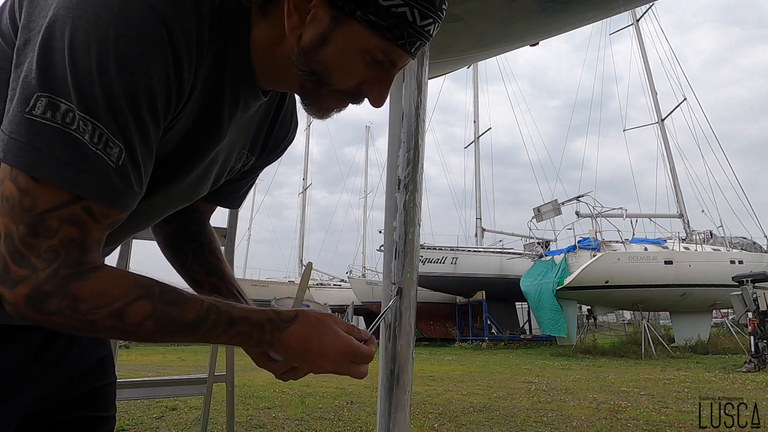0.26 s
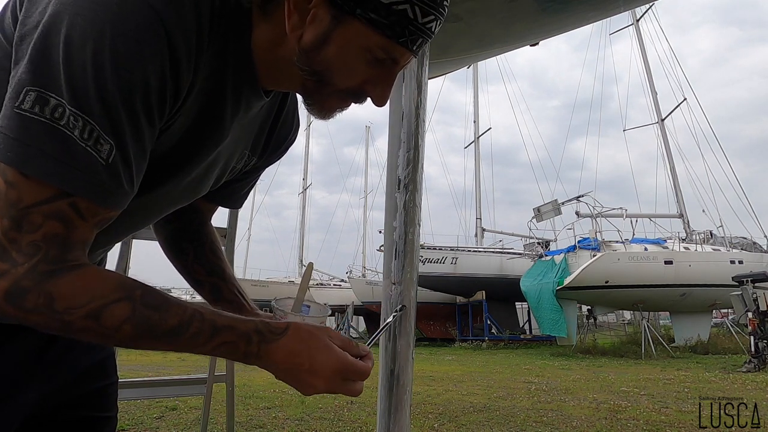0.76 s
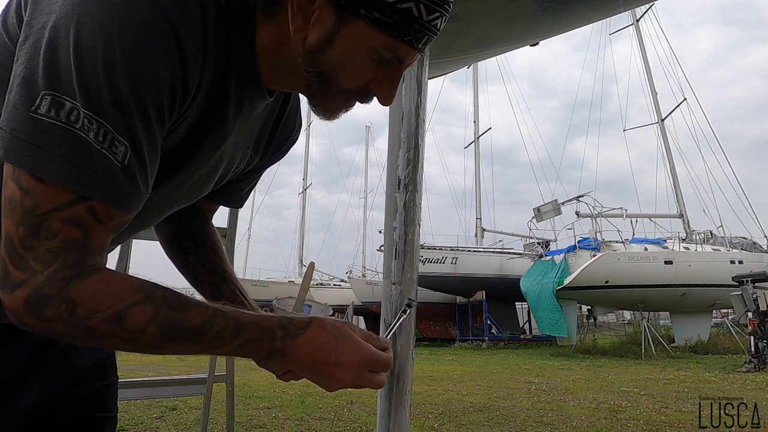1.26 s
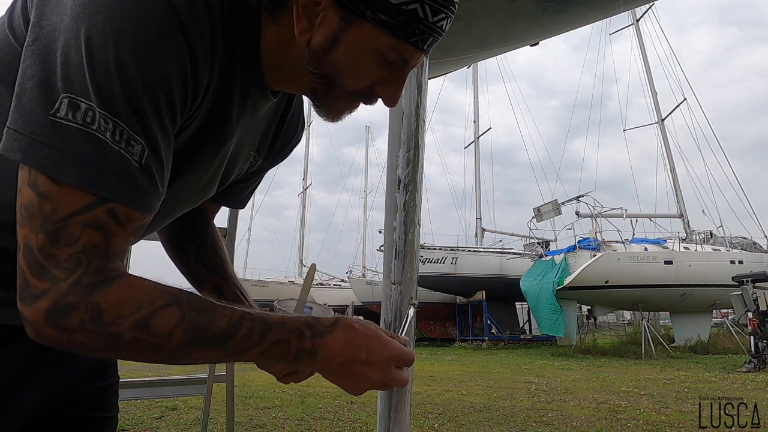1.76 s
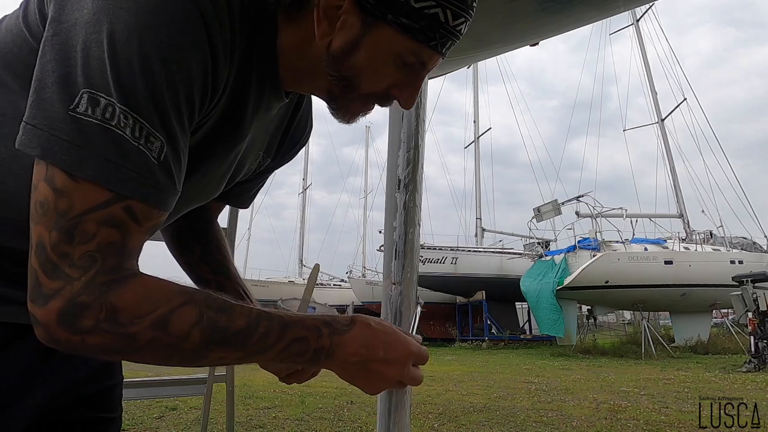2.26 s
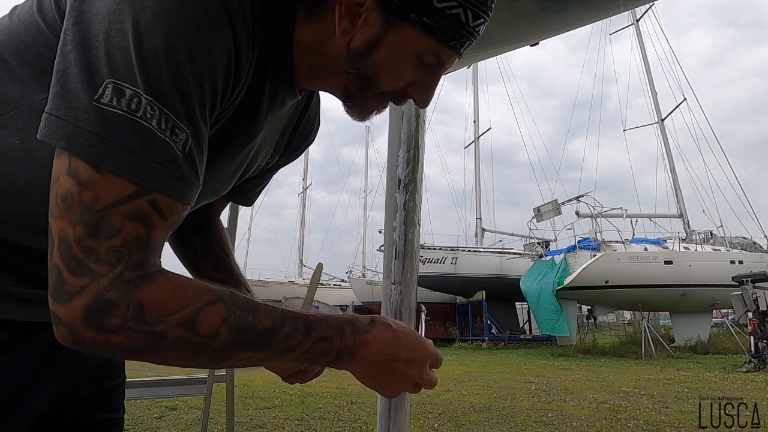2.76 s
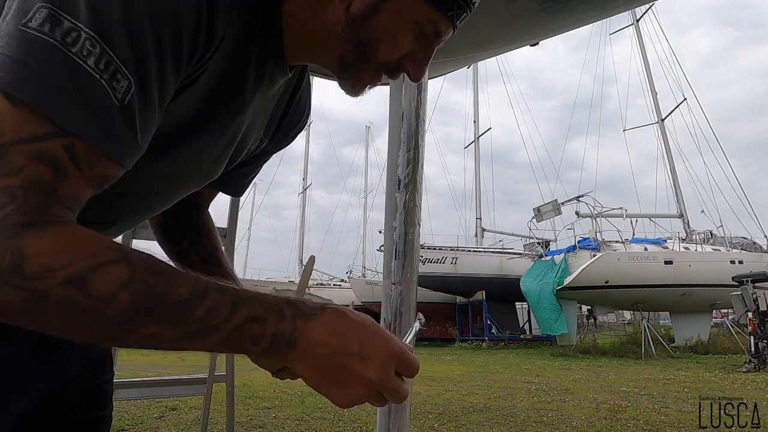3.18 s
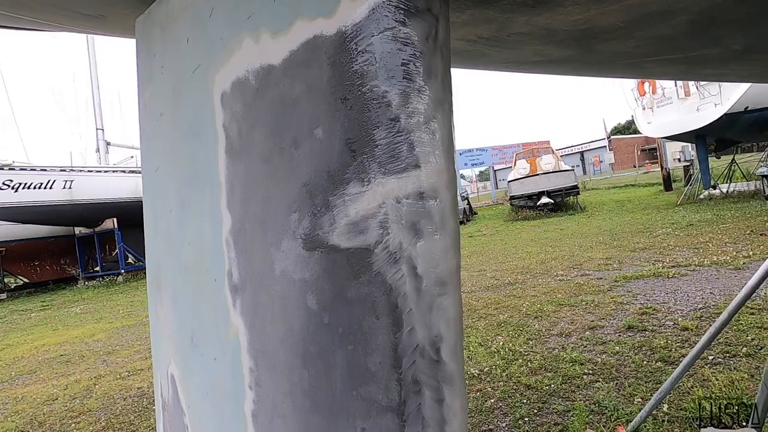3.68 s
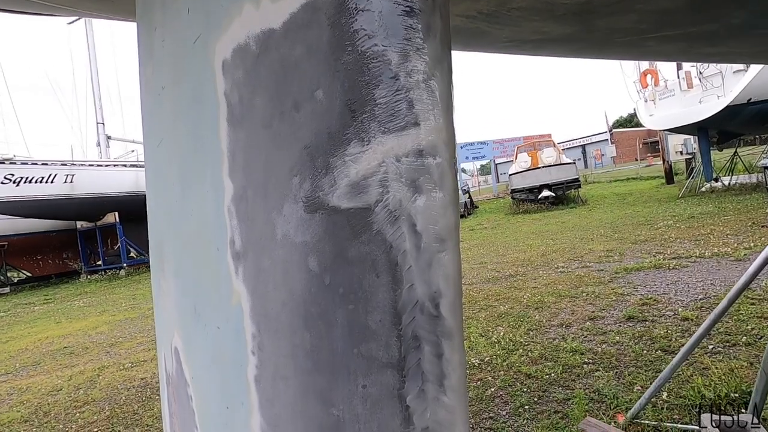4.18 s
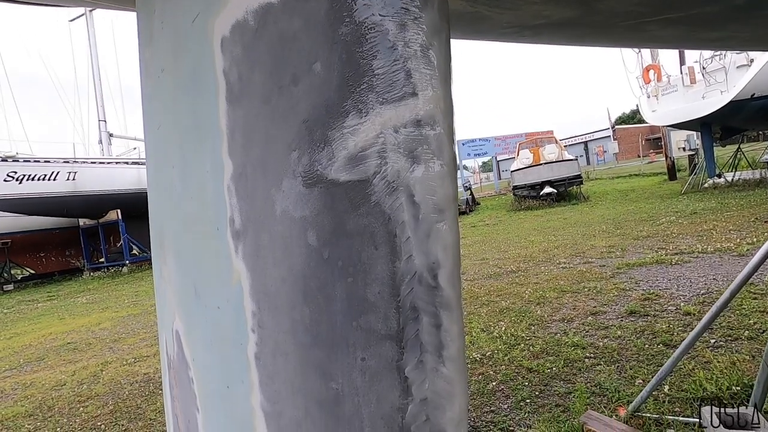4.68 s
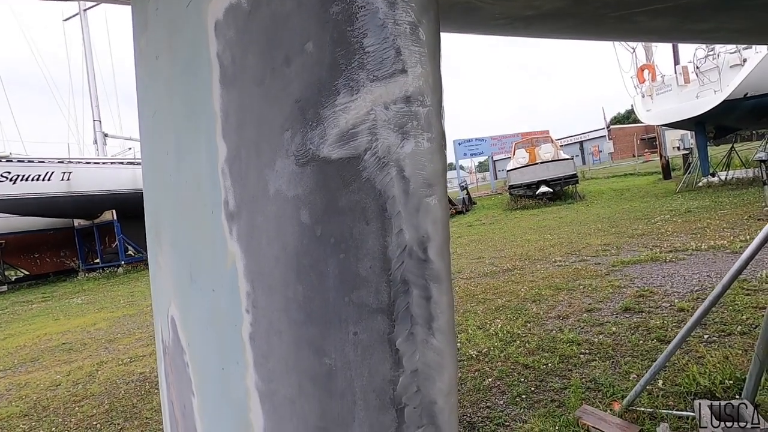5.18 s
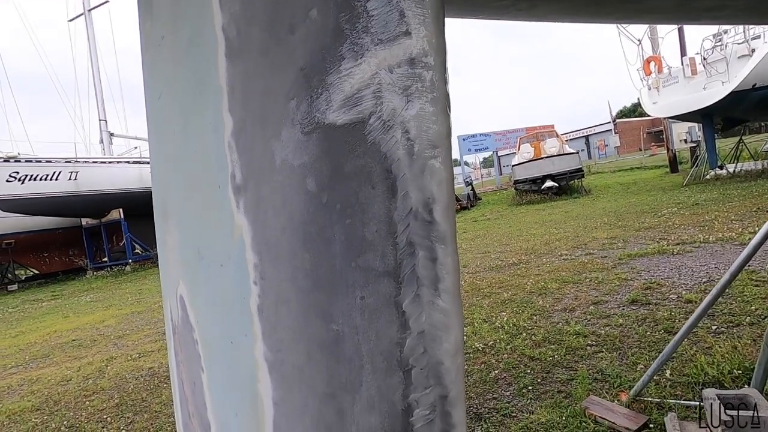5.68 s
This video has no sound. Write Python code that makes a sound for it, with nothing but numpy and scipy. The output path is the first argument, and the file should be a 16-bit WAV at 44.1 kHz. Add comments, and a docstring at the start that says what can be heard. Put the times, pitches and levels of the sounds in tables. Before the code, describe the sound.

From the start a low engine hums steadily in an open boatyard, leaning left, with light wind buffeting the microphone. Close by, a steel blade works sticky filler onto a boat's fin, making faint crackles and scattered dry ticks. At about 0.8 seconds it gives a quick ringing tap. From 3.2 to 3.6 seconds it drags over grit in short scrapes, snagging with small cracks and dull knocks.

At 3.6 seconds the hum cuts off abruptly and the sound moves to the centre. A distant diesel idles under a soft outdoor rumble while the ticks and crackles continue. The blade taps and rings at about 4.1 and 4.9 seconds, and two soft, very low handling thumps come at 4.1 and 4.6. Steel tools clink lightly at 4.2 and 5.0 seconds, then harder at 5.7 with a brief scrape.

```python
"""Filling a boat's fin

A boatyard in light wind: an engine hums low while a steel blade works filler onto the fin.
The blade scrapes over grit, snags, ticks and rings; the sticky filler crackles as it tears.
At an abrupt change of place the hum is gone: a far diesel idles, the blade works on,
steel tools clink close by and the hand on the microphone thumps softly."""
import sys
import numpy as np
from scipy import signal
from scipy.fft import rfft, irfft, next_fast_len
from scipy.io import wavfile
from scipy.ndimage import map_coordinates

SR = 44100
rng = np.random.default_rng(int(sys.argv[2]) if len(sys.argv) > 2 else 0)


def to_wav(s):
    """Save 16-bit WAV."""
    ch = np.atleast_2d(s).T  # columns
    pcm = np.round(np.clip(ch, -1, 1) * 32767)  # PCM
    wavfile.write(sys.argv[1], SR, pcm.astype(np.int16))


N = 261065
TIME_S = np.arange(N) / SR
CHANGE_S = 3.636  # first place to second
SIDES = np.array([[.5], [-.5]])  # left, right

# grit under the blade (frequency [Hz], density [dB])
GRIT_SPECTRUM = [(200, -46), (600, 0.5), (1500, 0.5), (3000, 0.5), (5000, -4), (7200, -9.5), (8500, -25.5),
                 (13000, -39.5), (16000, -48)]


def amp(db):
    """Decibels to gain."""
    return 10 ** (np.asarray(db) / 20)


def unit(x):
    """Scale to rms 1."""
    return x / np.sqrt(np.mean(x ** 2) + 1e-20)


def along(points, hz):
    """Read (frequency, value) points on a log axis."""
    knots_hz, values = np.transpose(points)
    return np.interp(np.log(hz + 1), np.log(knots_hz + 1), values)


def curve(points):
    """Read (time, value) points at every sample."""
    return np.interp(TIME_S, *np.transpose(points))


def wobble(rate_hz):
    """Smooth random curve."""
    return map_coordinates(rng.standard_normal(int(N * rate_hz / SR) + 4), [TIME_S * rate_hz])


def filtered(x, response):
    """Apply a complex frequency response."""
    size = x.shape[-1]
    padded = next_fast_len(size + 2 ** 12)
    return irfft(rfft(x, padded) * response(np.fft.rfftfreq(padded, 1 / SR)), padded)[..., :size]


def noise(spectrum, size):
    """Coloured noise, rms 1."""
    return unit(filtered(rng.standard_normal(size), lambda hz: amp(along(spectrum, hz))))


def rush(spectrum, coherence):
    """Stereo noise, rms 1; coherence as (frequency [Hz], left-right correlation)."""
    def response(hz):
        angle = np.arccos(np.clip(along(coherence, hz), -1, 1)) / 2
        return amp(along(spectrum, hz)) * [np.cos(angle), np.sin(angle)]
    mid, side = filtered(rng.standard_normal((2, N)), response)
    return unit(np.array([mid + side, mid - side]))


def tone(cycles, flutter_db, drift_rad):
    """Partial of rms 1; moving air makes level and phase waver."""
    phase = 2 * np.pi * (cycles + rng.random()) + drift_rad * wobble(5)
    return unit(np.sin(phase) * amp(flutter_db * wobble(11)))


def add(track, s, sound):
    """Mix a sound in at time s."""
    start = max(round(s * SR), 0)
    track[start:start + len(sound)] += sound[:max(N - start, 0)]


def attack(t, rise_s):
    """Exponential rise to 1."""
    return 1 - np.exp(-t / rise_s)


def ring(modes, t):
    """Damped modes, excited a little differently by each blow."""
    return sum(amp(db + rng.normal() - 60 * t / t60_s) * rng.choice([-1, 1]) * np.sin(2 * np.pi * hz * t)
               for hz, db, t60_s in modes)


def yard_air():
    """Distant yard noise at each of the two places."""
    # slow trend (time [s], relative level [dB])
    trend = [(0, -51), (2.4, -55.5), (3.63, -55), (3.65, -56), (5, -56), (5.92, -54)]
    # air at each place (frequency [Hz], density [dB])
    first_spectrum = [(100, -11), (400, -0.5), (700, -3.5), (1000, 1.5), (1400, 3), (2000, -5.5),
                      (3000, -11.5), (4500, -17), (7300, -20), (8400, -36), (16000, -59)]
    second_spectrum = [(12, -6), (30, 25), (130, 28), (230, 20), (320, 10), (450, 4.5), (580, -0.5),
                       (800, 1.5), (1600, 1.5), (2600, -10), (4500, -15), (7500, -18.5), (8800, -25.5),
                       (14000, -42.5)]
    # likeness of the microphone ports (frequency [Hz], correlation)
    first_coherence = [(100, 0.68), (1200, 1), (3000, 0.24), (5000, 0.15), (10000, 0.12)]
    second_coherence = [(30, 0.4), (150, 0.95), (1000, 0.97), (4000, 0.93), (9000, 0.39), (13000, 0.39)]
    trend_db = curve(trend)
    first = amp(trend_db + 2.5 + 1.6 * wobble(4.51)) * rush(first_spectrum, first_coherence)
    second = amp(trend_db + 15 + 0.7 * wobble(4.8)) * rush(second_spectrum, second_coherence)
    return first, second


def machinery():
    """Faint steady tones from across the yard, at each of the two places."""
    # whine (frequency [Hz], level at first place [dB], at second [dB])
    lines = [(106, -45, -62), (232, -52, -58), (360, -62.5, -67.5), (506, -63.5, -92)]
    return sum(amp([[first_db], [second_db]]) * tone(hz * TIME_S, flutter_db=4.5, drift_rad=0.85)
               for hz, first_db, second_db in lines)


def wind():
    """Gusts swell over a breeze and buffet each microphone port with low lumps of pressure."""
    # breeze at each place (relative level [dB], left minus right [dB])
    breeze = [(-40, 1), (-61, 0)]
    # gusts (peak time [s], length [s], relative level [dB], left minus right [dB])
    gusts = [(0.26, 0.48, -36, 8), (1.181, 0.66, -41, 4.5), (1.537, 0.14, -31.5, 18),
             (4.747, 0.42, -34.5, -3), (5.373, 0.69, -39, 30), (5.725, 0.56, -42, 4.5)]
    # buffeting (frequency [Hz], density [dB])
    spectrum = [(4, -23.5), (12, -4), (28, 2), (50, 0), (75, -0.5), (110, -9), (170, -19), (300, -37),
                (600, -58), (1500, -120)]
    at_ports = lambda db, lean_db: amp(db + SIDES * lean_db) / amp(SIDES * lean_db).mean()
    power = np.where(TIME_S < CHANGE_S, at_ports(*breeze[0]), at_ports(*breeze[1])) ** 2
    for s, length_s, db, lean_db in gusts:
        swell = np.cos(np.pi * np.clip((TIME_S - s) / length_s, -.5, .5))
        power += (at_ports(db, lean_db) * swell) ** 2
    lumps_db = 1.3 * np.array([wobble(28), wobble(11)])
    return np.sqrt(power) * amp(3.5 + lumps_db) * rush(spectrum, [(25, 1), (100, 0.88)])


def bumps():
    """The hand on the microphone shifts: soft, very low thumps."""
    # thumps (time [s], length [s], pitch [Hz], level [dB])
    thumps = [(4.114, 0.064, 41.5, -24), (4.632, 0.066, 33, -25)]
    track = np.zeros(N)
    for s, length_s, hz, db in thumps:
        t = np.arange(int(length_s * SR)) / SR
        add(track, s, amp(db) * np.hanning(len(t)) * np.sin(2 * np.pi * (hz * t + rng.random())))
    return track


def diesel():
    """Six unequal cylinders repeat their pattern every working cycle, so the idle lopes."""
    # partials (multiple of the cycle rate, level [dB])
    orders = [(6, -47), (10, -53), (12, -42), (15, -49), (16, -48), (18, -44), (21, -45), (23, -44),
              (24, -46), (25, -54), (28, -52), (29, -52), (30, -58), (36, -57), (37, -59)]
    cycle_hz = 5.834
    cycles = cycle_hz * TIME_S + 0.0023 * wobble(2.073)
    return sum(amp(db) * tone(round(k) * cycles, flutter_db=0.5, drift_rad=0.023) for k, db in orders)


def engine():
    """Two firings per shaft turn; the hum grows with speed, the exhaust adds a throbbing drone."""
    # speed picks up, then eases (time [s], firing rate [Hz])
    speed = [(0.2, 82.7), (0.9, 83.6), (1.3, 82.6), (1.6, 82.4), (2.1, 81.3), (3.1, 81.1), (3.5, 80.6)]
    # partials (multiple of the shaft rate, relative level [dB], gain with firing rate [dB/Hz])
    orders = [(1, -6, 1.9), (2, 0.5, 3), (3, -14, -2), (4, -18, 0.5), (5, -37.5, 6), (6, -34, 2),
              (8, -39.5, 5.5)]
    # exhaust (frequency [Hz], density [dB])
    drone = [(30, -36.5), (100, -7), (170, 1.5), (230, -9), (300, -12), (370, -15), (420, -26.5),
             (470, -17.5), (515, -12.5), (560, -20), (630, -30.5), (1200, -58), (3000, -120)]
    firing_hz, cruise_hz = curve(speed), 82
    turns = np.cumsum(firing_hz / 2) / SR
    partial = lambda k: tone(k * turns, flutter_db=0.35 * k, drift_rad=0.03 * k)
    hum = sum(amp(db + db_per_hz * (firing_hz - cruise_hz)) * partial(round(k))
              for k, db, db_per_hz in orders)
    hum *= amp(-25 + 0.6 * wobble(8))
    throb = 1 + 0.31 * np.sin(2 * np.pi * 2 * turns)
    return hum + amp(-39.5) * throb * rush(drone, [(100, 0.74), (500, 0.47)])


def hulls(x, t60_s):
    """Scattered echoes from the hulls around."""
    t = np.arange(SR // 2) / SR
    tails = np.array([noise([(300, -7.5), (3500, 10), (9000, -5.5)], len(t)) for _ in range(2)])
    tails *= amp(-60 * t / t60_s) * (t > .006)
    return signal.fftconvolve(x[None], tails / np.linalg.norm(tails[0]), axes=1)[:, :N]


def nearby(x, lean_db, scatter):
    """Close sound, louder at left, smeared by hands and hull; scatter as (frequency [Hz], gain [dB])."""
    t = np.arange(SR // 128) / SR
    smear = rng.standard_normal(len(t)) * amp(-60 * t / 0.027)
    smeared = signal.fftconvolve(x, smear[None] / np.linalg.norm(smear))[:, :N]
    scattered = filtered(smeared, lambda hz: amp(along(scatter, hz)))
    return amp(SIDES * lean_db) * (x + 2 * SIDES * scattered)


def crackle():
    """Sticky filler tears in clumps of tiny, bright snaps."""
    # snaps at each place (base rate [1/s], base level [dB])
    tearing = [(45, -72), (85, -69.5)]
    # one snap (frequency [Hz], density [dB])
    spectrum = [(1000, -20), (4500, -6), (7300, 1), (8800, -7), (12500, -9), (16000, -22)]
    t60_s = 0.011
    per_s, db = np.where(TIME_S < CHANGE_S, *np.array(tearing)[:, :, None])
    snaps = rng.random(N) < per_s * amp(5 * wobble(10)) / SR
    sizes = amp(db + 4.5 * np.minimum(rng.exponential(size=N), 3))
    power = signal.lfilter([1], [1, -amp(-60 / (t60_s * SR)) ** 2], snaps * sizes ** 2)
    return np.sqrt(np.abs(power)) * noise(spectrum, N)


def scrapes():
    """The blade drags over grit in tiny catches: quick rise, slower fade."""
    # strokes (time [s], length [s], level [dB], tilt [dB/octave])
    strokes = [(2.138, 0.067, -63, 6), (3.211, 0.19, -52.5, 0.5), (3.218, 0.075, -58.5, 12.5),
               (3.352, 0.3, -65.5, 6), (3.501, 0.13, -51.5, 0), (3.534, 0.044, -46.5, -1.5),
               (3.582, 0.054, -53, 0), (3.794, 0.05, -63, 10.5), (4.059, 0.051, -65, 26),
               (5.723, 0.085, -52.5, 3)]
    track, catch_samples = np.zeros(N), 32
    for s, length_s, db, tilt_db in strokes:
        size = int(length_s * SR)
        hiss = rng.standard_normal(size)
        catches_db = 3.6 * np.minimum(rng.exponential(size=size // catch_samples + 1), 3.5)
        colour = lambda hz: amp(along(GRIT_SPECTRUM, hz) + tilt_db * np.log2(np.maximum(hz, 500) / 3000))
        grit = filtered(hiss * amp(catches_db).repeat(catch_samples)[:size], colour)
        swell = np.abs(np.sin(np.pi * np.linspace(0, 1, size) ** 0.69))
        add(track, s, amp(db) * unit(grit) * unit(swell))
    return track


def thud(pitch_hz, t, t60_s):
    """Two broad resonances that die quickly."""
    width = 0.46  # bandwidth over pitch
    peak = lambda hz, fc: 1j * hz * width * fc / (fc * fc - hz * hz + 1j * hz * width * fc)
    response = lambda hz: peak(hz, pitch_hz) ** 2 + 0.073 * peak(hz, 1.7 * pitch_hz) ** 2
    return unit(filtered(rng.standard_normal(len(t)), response)) * amp(-60 * t / t60_s)


def snags():
    """Pressed flat, the blade cannot ring: each lump gives a dead thud and a gritty crack."""
    # lumps and dents (time [s], thud [dB], pitch [Hz], t60 [s], crack [dB])
    lumps = [(0.809, -37, 565, .07, -60.5), (3.248, -44.5, 3000, .03, -50.5),
             (3.264, -39.5, 1300, .04, -35), (3.292, -42.5, 2170, 0.054, -38),
             (3.337, -40.5, 990, 0.11, -55), (3.351, -39.5, 1046, 0.04, -42.5),
             (3.5366, -40.5, 2930, 0.035, -37.5), (3.541, -45, 2600, 0.022, -38),
             (3.5468, -46, 3000, 0.012, -44), (3.5596, -48, 3000, .04, -42),
             (3.6204, -28, 1200, 0.028, -51)]
    track, t = np.zeros(N), np.arange(SR // 8) / SR
    for s, db, hz, t60_s, crack_db in lumps:
        crack = amp(crack_db - 60 * t / 0.013) * noise(GRIT_SPECTRUM, len(t))
        add(track, s, (amp(db) * thud(hz, t, t60_s) + crack) * attack(t, rise_s=0.0002))
    return track


def ticks():
    """Dry contacts of blade and filler, each with its own brightness."""
    # contacts (time [s], relative level [dB], tilt [dB/octave])
    contacts = [(0.238, -49.5, 19), (0.447, -36.5, -3.5), (0.701, -49.5, -1), (0.919, -48, -3),
                (1.061, -44, 7), (1.493, -55, 12), (1.666, -49, -2.5), (1.85, -57.5, 12.5),
                (1.897, -44, -10), (2.171, -48, -8), (2.228, -34.5, -2), (2.83, -43.5, -7.5),
                (3.3596, -39.5, 1), (3.366, -42, 3.5), (3.7783, -38.5, -3), (3.799, -34.5, -6.5),
                (4.0195, -42.5, 6.5), (4.043, -42.5, -2.5), (4.091, -46, 2), (4.1092, -37.5, 14.5),
                (4.1966, -50, 14.5), (4.247, -47, 8.5), (4.268, -37.5, -4.5), (4.332, -47.5, 1.5),
                (4.58, -44.5, 14), (4.748, -36, -1.5), (5.183, -37.5, 3.5), (5.333, -44.5, -3.5),
                (5.686, -38, -12.5), (5.7195, -44.5, -6), (5.742, -37.5, 15.5), (5.797, -40, -1),
                (5.8798, -41, 8)]
    # one tick (frequency [Hz], density [dB])
    spectrum = [(500, -39), (2000, -18.5), (4500, -8), (7200, 1.5), (8800, -15), (13000, -23), (16000, -33)]
    track, t = np.zeros(N), np.arange(SR // 16) / SR
    envelope = (amp(-60 * t / 0.0057) + amp(-8.5 - 60 * t / 0.055)) * attack(t, rise_s=0.00089)
    for s, db, tilt_db in contacts:
        colour = [(hz, level + tilt_db * np.log2(hz / 7000) + rng.normal(0, 2)) for hz, level in spectrum]
        add(track, s, amp(db - 5.5) * envelope * noise(colour, len(t)))
    return track


def taps():
    """Blade on fin: the contact point sets which modes ring, the grip how long; the fin knocks."""
    # contacts (time [s], four blade modes [dB], knock [dB], crack [dB], grip's factor on t60)
    contacts = [(0.7963, -39, -54, -52, -35, -47.5, -45, 0.49),
                (0.7985, -35, -60, -51.5, -29.5, -54, -46, 0.42),
                (0.8075, -58.5, -46, -54, -44, -51, -50, .6),
                (0.8135, -43.5, -58.5, -60, -52, -58, -57, 0.83),
                (0.8194, -40.5, -56, -62, -56, -57.5, -60, 0.3),
                (1.756, -79, -80, -66, -57.5, -81, -70, 0.9),
                (2.021, -74.5, -74.5, -60, -71, -69, -58.5, 1.9),
                (3.115, -52, -72, -76, -81, -73, -63, 0.54),
                (3.195, -63, -43.5, -54, -45, -70, -44.5, 0.23),
                (4.1085, -61, -56, -50, -31.5, -36.5, -43.5, 0.8),
                (4.1124, -60, -61, -48, -30.5, -42, -41, 0.8), (4.116, -56, -54, -56, -40, -46.5, -39.5, 1),
                (4.1222, -53, -43.5, -60, -47, -42.5, -52, 0.85),
                (4.9051, -52, -52, -60, -45, -43, -41.5, 1), (4.9148, -57, -51, -68, -56, -46, -57, 0.66),
                (4.965, -66, -56, -54, -68, -64, -54, 0.44)]
    # blade modes (frequency [Hz], base t60 [s])
    blade_modes = [(2706, .23), (3405, .25), (6270, .08), (6498, .047)]
    # dull fin modes (frequency [Hz], relative level [dB], t60 [s])
    fin_modes = [(630, -5.5, 0.042), (1150, 2, .035), (1428, 4, 0.067), (1566, 2, 0.035),
                 (2320, -0.5, 0.075), (2864, -12, 0.12), (3558, -15, 0.055), (4170, -8, 0.046)]
    # contact crack (frequency [Hz], density [dB])
    spectrum = [(300, -42), (850, -1), (1300, -7), (2000, 4.5), (4600, 5), (5600, -3), (7300, 4),
                (9000, -18), (13000, -34), (16000, -48)]
    track, t = np.zeros(N), np.arange(SR // 3) / SR
    next_times = [row[0] for row in contacts[1:]] + [N / SR]
    for (s, *modes_db, knock_db, crack_db, grip), next_s in zip(contacts, next_times):
        modes = [(hz, db, t60_s * max(grip, .1)) for (hz, t60_s), db in zip(blade_modes, modes_db)]
        crack = amp(crack_db - 60 * t / 0.085) * noise(spectrum, len(t))
        tap = ring(modes, t) + amp(knock_db) * ring(fin_modes, t) + crack
        choke = amp(-60 * np.maximum(s + t - next_s, 0) / 0.0062)  # next contact stops the ring
        add(track, s, tap * attack(t, rise_s=0.00031) * choke)
    return track


def clinks():
    """Steel on steel rattles and rings: a light touch wakes a few modes, a hard blow nearly all."""
    # blows (time [s], ring [dB], rattle [dB], tilt [dB/octave], hardness [0-1])
    blows = [(4.2432, -43, -44.5, -14, 0), (5.0397, -35, -41.5, -0.5, 0), (5.7406, -24, -26, 1, 0.86),
             (5.7478, -40, -37.5, -10, 0.9)]
    # tool modes (frequency [Hz], light touch [dB], hard blow [dB], t60 [s])
    steel_modes = [(1250, -14, -22, .13), (1987, 1, 0, .12), (2309, -15, -5, .12), (2638, -5, -6, .1),
                   (2990, -26, -6, .13), (3056, -10, -6, .15), (3413, -21, -10, .12), (3741, -18, -8, .09),
                   (3898, -9, -6, .09), (4161, -9, 0, .08), (4441, -12, -7, .11), (4755, -9, -6, .1),
                   (5464, -8, -19, .075), (6630, -12, -14, .075), (7150, -20, -17, .06),
                   (7550, -17, -24, .07), (8516, -18, -21, .06)]
    # dense, brief rattle (frequency [Hz], density [dB])
    spectrum = [(600, -18), (1250, -4.5), (1650, -4), (1950, 10.5), (2500, -1), (3400, 5.5), (3900, 3),
                (4800, -5), (5300, -0.5), (5900, -9), (6800, -2.5), (8600, -13.5), (9400, -23.5),
                (12500, -26.5), (16000, -37.5)]
    track, t = np.zeros(N), np.arange(SR // 3) / SR
    for s, ring_db, rattle_db, tilt_db, hardness in blows:
        modes = [(hz, np.interp(hardness, [0, 1], [light_db, hard_db]) + tilt_db * np.log2(hz / 2000), t60_s)
                 for hz, light_db, hard_db, t60_s in steel_modes]
        rattle = amp(rattle_db - 60 * t / 0.1) * noise(spectrum, len(t))
        add(track, s, (amp(ring_db) * ring(modes, t) + rattle) * attack(t, rise_s=0.00049))
    return track


def scene():
    """Sounds lean left at the first place and come from nearly straight ahead at the second."""
    # port balance at the first place (frequency [Hz], left minus right [dB])
    lean = [(90, 6.8), (180, 3.5), (320, 3.1), (1000, 2.5), (2700, 4.4), (8000, 1.4)]
    # port phase at the first place (frequency [Hz], left lag [rad])
    lag = [(125, .05), (190, 0.15), (1000, 1), (3500, 1.1), (5000, 3)]
    ports = lambda hz: amp(SIDES * along(lean, hz)) * np.exp(-1j * SIDES * along(lag, hz))
    buffeting = wind()
    whine_first, whine_second = machinery()
    work = scrapes() + snags() + ticks() + crackle() + taps() + clinks()
    work = work + amp(-18.5) * hulls(work, t60_s=0.19)
    air_first, air_second = yard_air()
    first = filtered(engine() + whine_first + air_first, ports) + amp(6) * buffeting
    first += nearby(work, lean_db=9, scatter=[(1500, -7), (6500, -4.5), (10000, 0)])
    second = diesel() + bumps() + whine_second + air_second + buffeting
    second += nearby(work, lean_db=1.4, scatter=[(1000, -10), (4500, -24), (9500, -3)])
    crossfade = np.clip((TIME_S - CHANGE_S) / 0.0022 + .5, 0, 1)
    return (1 - crossfade) * first + crossfade * second


def record(dry):
    """The image closes to mono at the change of place, then reopens; the top treble is cut."""
    mono_until_s, opening_s, top_hz = 4.65, 0.74, 15700
    mid = dry.mean(axis=0)
    width = np.where(TIME_S < CHANGE_S, 1, np.clip((TIME_S - mono_until_s) / opening_s, 0, 1))
    return filtered(mid + width * (dry - mid), lambda hz: hz < top_hz)


dry = scene()
out = record(dry)
to_wav(out)
```